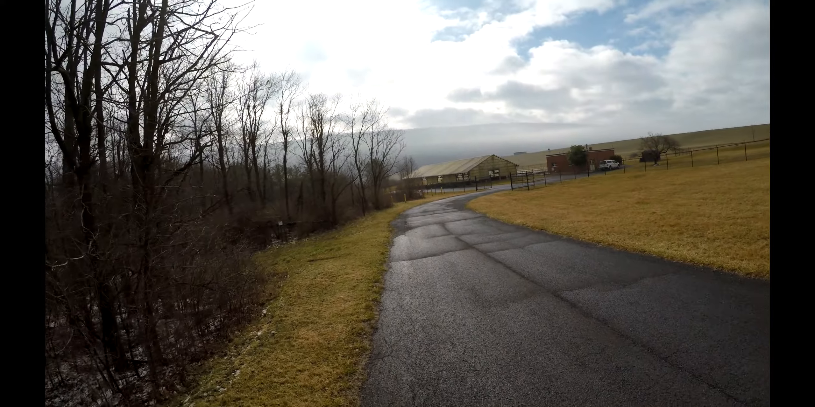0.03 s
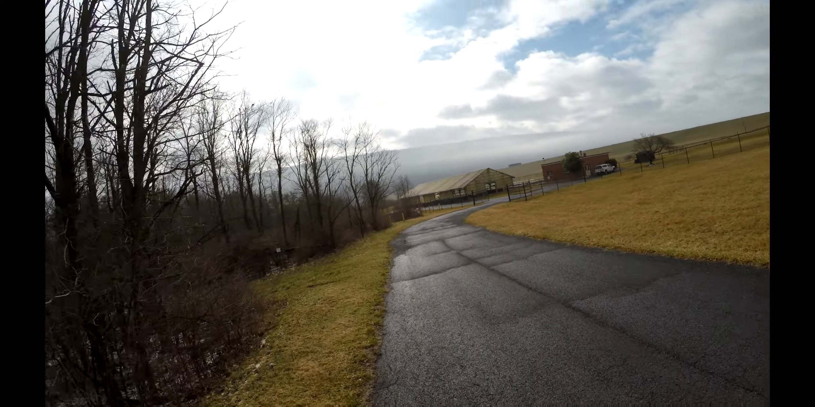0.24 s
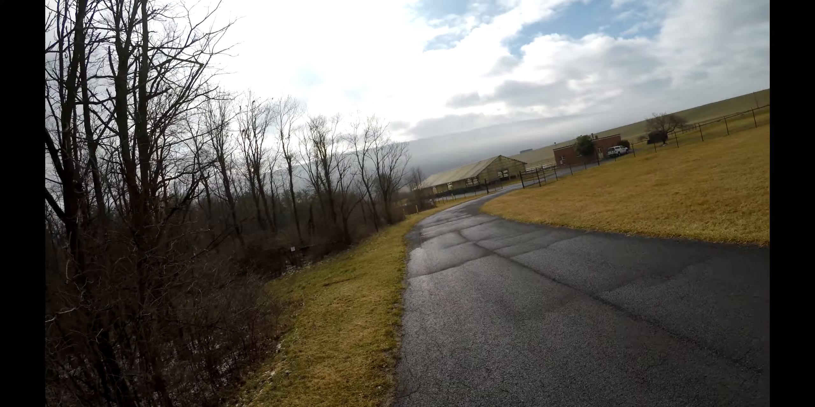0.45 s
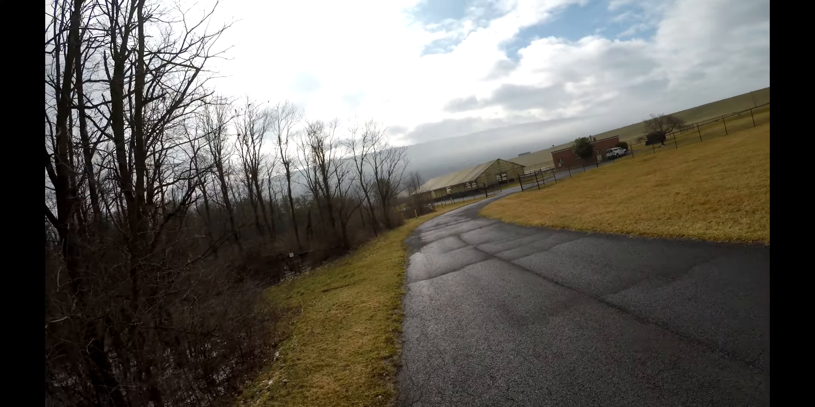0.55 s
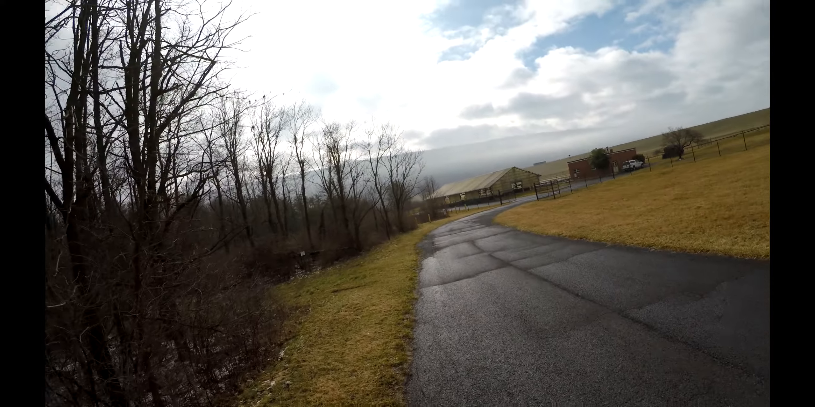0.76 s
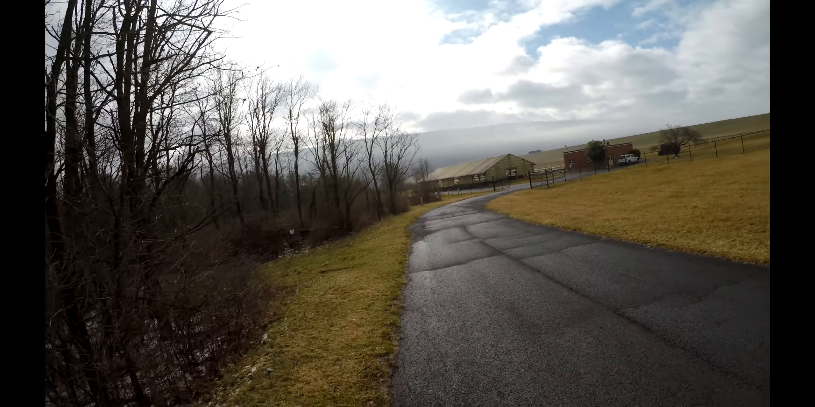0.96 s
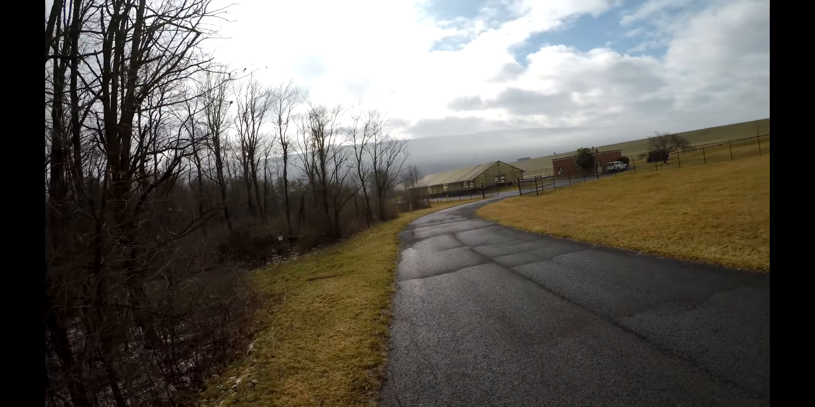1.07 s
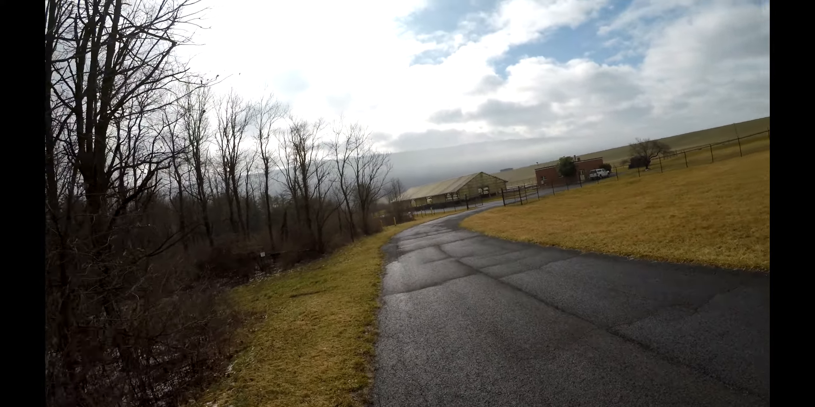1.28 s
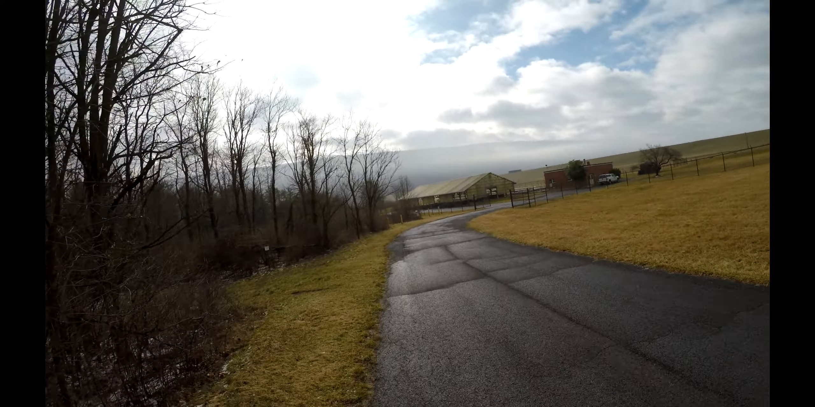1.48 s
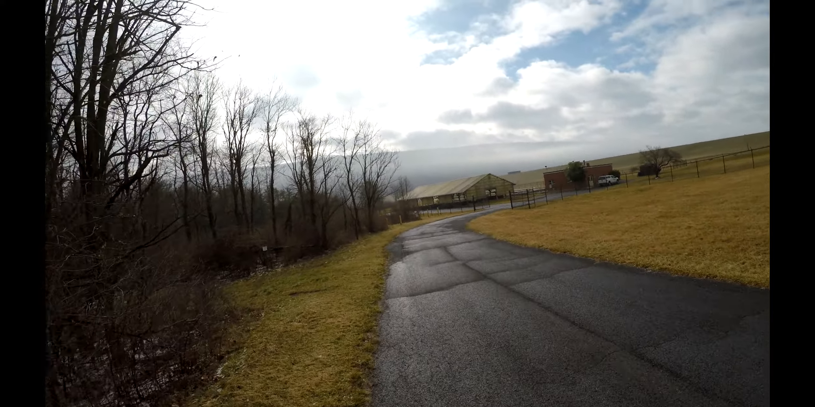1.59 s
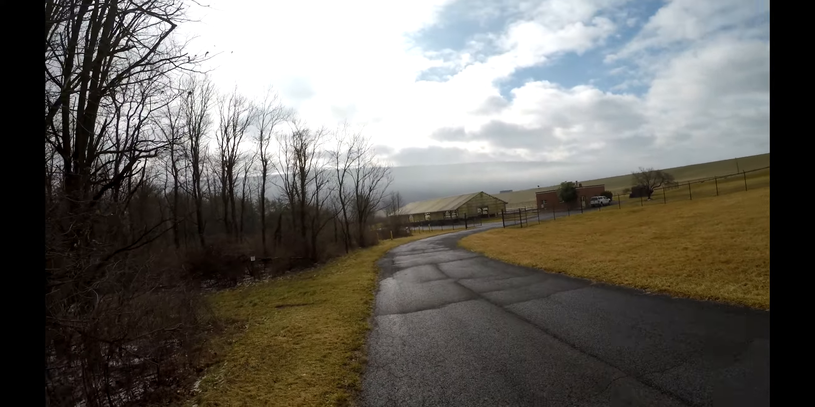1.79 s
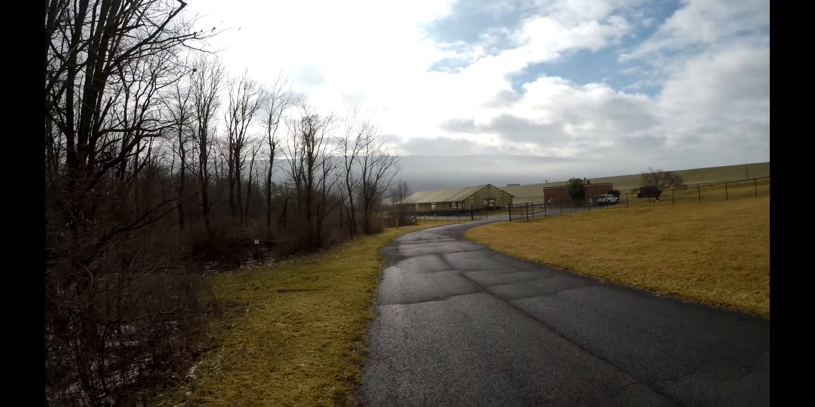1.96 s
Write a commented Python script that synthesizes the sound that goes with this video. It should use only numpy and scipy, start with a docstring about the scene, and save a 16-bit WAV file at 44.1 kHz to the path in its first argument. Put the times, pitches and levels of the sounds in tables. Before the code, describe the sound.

A plastic kayak hull is dragged over asphalt very close to the microphone: deep pulsing shudders, soft grainy grinding, ticking stones, one sharp hollow knock midway, then more bumps; faint bird whistles and wind outdoors.

```python
"""Plastic hull dragged over asphalt

A kayak is dragged close to two ports. With every step its hull shudders very low: swept sines with an octave partial.
All along it rumbles and grinds, rising and falling with the drag: patchy coloured noise, sparse grit in the grinding.
Stones tick, bumps ring and one knock sounds as damped modes; scuffs are grainy noise through hull resonances.
Far off, two whistles and a trill are frequency-modulated sines, and wind in bare trees is steady filtered noise."""
import sys
import numpy as np
from scipy import signal
from scipy.fft import rfft, irfft, next_fast_len
from scipy.io import wavfile
from scipy.ndimage import uniform_filter1d, map_coordinates

SR = 44100
rng = np.random.default_rng(int(sys.argv[2]) if len(sys.argv) > 2 else 0)


def wrap_up_sound(samples):
    """Save the sound to the file named by the first command line argument, as 16-bit audio."""
    columns = np.atleast_2d(samples).T
    # keep every value between -1 and 1, then stretch to whole-number steps
    tamed = np.clip(columns, -1, 1)
    steps = np.round(tamed * 32767).astype(np.int16)
    wavfile.write(sys.argv[1], SR, steps)


def natural_amplitude(level_db):
    """Convert a level in decibels to a linear amplitude factor, elementwise."""
    exponent = np.asarray(level_db, float) / 20
    return 10 ** exponent


N = 89655  # length in samples
LEFT_LAG_S = 0.0003465  # extra travel time to the left port

# Left-right correlation of the grinding and of the wind: f/Hz, likeness [0 to 1]
HIGH_ALIKE = [(300, 1), (700, 0.88), (2000, 0.22), (4000, 0.031), (8000, 0.041)]


def unit(x):
    """Normalisation: scale a signal to rms 1."""
    return x / np.sqrt(np.mean(x ** 2) + 1e-20)


def along(points, hz):
    """Interpolation of (f/Hz, value) points on a logarithmic frequency axis."""
    f, v = np.transpose(points)
    return np.interp(np.log(hz + 1), np.log(f + 1), v)


def wobble(rate):
    """Band-limited fluctuation: a spline through random knots, rate of them a second."""
    knots = rng.standard_normal(int(N * rate / SR) + 4)
    return map_coordinates(knots, [np.arange(N) * rate / SR])


def filtered(x, response):
    """Linear filtering: the spectrum times a complex response of frequency."""
    m = next_fast_len(x.shape[-1] + 8192)
    hz = np.fft.rfftfreq(m, 1 / SR)
    return irfft(rfft(x, m) * response(hz), m)[..., :x.shape[-1]]


def hiss(colour, count):
    """Coloured noise of rms 1: white noise shaped by a magnitude response."""
    return unit(filtered(rng.standard_normal(count), lambda hz: natural_amplitude(along(colour, hz))))


def spread(pair, spectrum, alike):
    """Interchannel coherence: mid and side noises give a coloured pair of rms 1; the left port is farther."""
    # Left over right by frequency: f/Hz, level difference/dB
    port_lean = [(30, -6.5), (110, -1), (200, -0.5), (700, -3.5), (2300, -2), (4200, 0.5), (7800, -4.5),
                 (14000, 0)]

    def mid_side(hz):
        angle = np.arccos(np.clip(along(alike, hz), -1, 1)) / 2
        return natural_amplitude(along(spectrum, hz)) * np.array([np.cos(angle), np.sin(angle)])

    def ports(hz):
        left = natural_amplitude(along(port_lean, hz)) * np.exp(-2j * np.pi * hz * LEFT_LAG_S)
        return np.array([left, np.ones(len(hz))])

    mid, side = filtered(pair, mid_side)
    return unit(filtered(np.array([mid + side, mid - side]), ports))


def patchy(patchy_db):
    """Non-stationary noise: two noises share time-frequency patches of random gain."""
    z = signal.stft(rng.standard_normal((2, N)), nperseg=512)[2]
    field = rng.standard_normal(z.shape[1:])
    field = uniform_filter1d(field, size=6, axis=0)
    field = uniform_filter1d(field, size=6, axis=1)
    noise = signal.istft(z * natural_amplitude(patchy_db * unit(field)), nperseg=512)[1]
    return unit(noise[:, :N])


def ring(modes, t, scatter_db, rise_s):
    """Modal decay: damped sines, each a little different in level and pitch at every blow."""
    total = 0
    for hz, db, t60 in modes:
        level = db + scatter_db * rng.normal() - 60 * t / t60
        pitch = hz * (1 + 0.0073 * scatter_db * rng.normal())
        total = total + natural_amplitude(level) * np.sin(2 * np.pi * pitch * t)
    return (1 - np.exp(-t / rise_s)) * total


def add(out, s, sound, left_db, lag_s=LEFT_LAG_S):
    """Interchannel level and time difference: place a sound at s, the left delayed by lag_s."""
    for ch, (lag, db) in enumerate([(lag_s, left_db / 2), (0, -left_db / 2)]):
        part = out[ch, round((s + lag) * SR):][:len(sound)]
        part += natural_amplitude(db) * sound[:len(part)]


def air():
    """Turbulence noise: a steady far hiss of wind in bare trees."""
    # Wind spectrum: f/Hz, relative level/dB per Hz
    air_colour = [(710, -31), (1200, -8), (1280, 5.5), (1610, -4.5), (2030, -10.5), (5440, -23),
                  (6500, -20.5), (7050, -11.5), (7800, -14), (8300, -22), (9900, -10.5), (14800, -43)]
    level = -63.5 + 0.61 * wobble(7.9)
    return natural_amplitude(level) * spread(patchy(patchy_db=1.0), air_colour, HIGH_ALIKE)


def whistles():
    """Frequency modulation: two thin whistled calls: one arches and falls, one rises, dips and climbs again."""
    # Two calls, each a path of t/s, f/Hz, level/dB, before wavering
    whistle_calls = [
        [(.305, 2690, -70), (.318, 2710, -60), (.33, 2740, -72), (.342, 2730, -70), (.352, 2710, -60),
         (.38, 2670, -66), (.42, 2645, -66), (.45, 2480, -64), (.468, 2290, -70)],
        [(.645, 2620, -70), (.67, 2740, -58), (.7, 2740, -59), (.73, 2715, -63), (.76, 2700, -62),
         (.78, 2630, -61), (.8, 2690, -63), (.82, 2720, -62), (.835, 2760, -72)],
    ]
    waver_hz, waver_db = 18, 3.2
    t, out = np.arange(N) / SR, np.zeros(N)
    for call in whistle_calls:
        s, hz, db = np.transpose(call)
        pitch = np.interp(t, s, hz) + waver_hz * wobble(60)
        level = np.interp(t, s, db, left=-120, right=-120) + waver_db * wobble(80)
        out += np.sqrt(2) * natural_amplitude(level) * np.sin(2 * np.pi * np.cumsum(pitch) / SR)
    return out


def trill():
    """Amplitude modulation by noise: a wavering sine made rough and breathy, louder at the right."""
    # Pitch path: t/s, f/Hz before wavering, level/dB before roughness and stereo lean
    trill_path = [(0.6, 7000, -68), (0.631, 7600, -53.5), (.655, 7400, -58), (.675, 7800, -60),
                  (0.7, 7800, -55), (.715, 7280, -62), (.74, 7320, -51), (0.775, 7500, -66)]
    waver_hz, rough_hz = 99, 380
    t = np.arange(N) / SR
    s, hz, db = np.transpose(trill_path)
    pitch = np.interp(t, s, hz) + waver_hz * wobble(120)
    level = np.interp(t, s, db, left=-120, right=-120)
    tone = wobble(rough_hz * 2) * np.sin(2 * np.pi * np.cumsum(pitch) / SR)
    return natural_amplitude([[-3], [3]]) * natural_amplitude(level) * tone


def ticks():
    """Impact excitation: a stone under the hull rings three short modes with a snap of treble noise."""
    # Stones: t/s, level/dB before trim, f/Hz, treble over middle/dB, left over right/dB
    stones = [(0.667, -41.5, 2000, -6.5, -14.5), (0.682, -37, 2010, -17, -17), (0.728, -46.5, 1340, -8, -5),
              (0.744, -41.5, 2760, -0.5, -2), (0.8254, -45, 1290, -12, 3), (0.9063, -54, 1470, -29, -13),
              (1.0067, -44.5, 1690, -6.5, -7.5), (1.1309, -38.5, 1920, -18, -8),
              (1.1324, -37.5, 3600, -21, -11), (1.3355, -40, 2040, -9, -11),
              (1.3485, -44.5, 3640, -1.5, -11), (1.5788, -49, 2180, -24, -18),
              (1.6063, -41, 1800, -11.5, -12.5), (1.6902, -36.5, 2120, -14.5, -14),
              (1.9104, -42.5, 1250, -21, -12), (1.9905, -45, 2090, -30, -14), (2.02, -43, 1570, -22, 3)]
    # Snap spectrum: f/Hz, relative level/dB
    snap_colour = [(2500, -36), (4000, -2.5), (6000, -6), (7500, 3.5), (10000, -13), (14000, -26.5)]
    trim_db, cycles, snap_s = 1.0, 11, 0.025  # cycles and s to fall by 60 dB
    out, t = np.zeros((2, N)), np.arange(SR // 10) / SR
    for s, db, hz, treble_db, left_db in stones:
        t60 = cycles / hz
        modes = [(hz, 0, t60), (0.64 * hz, -6, t60), (1.36 * hz, -6, t60)]
        skin = ring(modes, t, scatter_db=0.8, rise_s=0.0001)
        snap = natural_amplitude(treble_db - 60 * t / snap_s) * hiss(snap_colour, len(t))
        add(out, s, natural_amplitude(db + trim_db) * (skin + snap), left_db, lag_s=0.00007)
    return out


def bumps():
    """Modal decay: the hull's low bumps and rings, and a few small bright scrape grains."""
    # Bumps and grains: t/s, level/dB before trim, f/Hz, t60/s, left over right/dB
    hull_bumps = [(.147, -37, 200, .06, -2), (.296, -39, 450, .02, -5), (.479, -41, 600, .025, -3),
                  (.69, -31, 205, .2, -3), (.749, -41, 1600, .035, -3), (1.484, -40, 550, .03, -3),
                  (1.657, -33, 420, .04, -4), (1.656, -37, 1200, .025, -8), (1.6575, -43, 2250, .02, -8),
                  (1.666, -44, 2300, .02, -8), (1.673, -39, 480, .05, -4), (1.703, -32, 220, .2, -3),
                  (1.7885, -31.5, 440, .025, -2), (1.7665, -43, 1550, .02, -8),
                  (1.767, -46, 2750, .015, -8), (1.778, -46, 2150, .02, -8), (1.841, -38, 300, .04, -2),
                  (1.84, -45, 1600, .018, -4), (1.952, -38, 700, .018, -4), (1.97, -50, 750, .14, -2)]
    trim_db = 3.5
    out, t = np.zeros((2, N)), np.arange(SR // 10) / SR
    for s, db, hz, t60, left_db in hull_bumps:
        modes = [(hz, 0, t60), (1.4 * hz, -8, 0.4 * t60)]
        sound = ring(modes, t, scatter_db=1, rise_s=0.0005)
        add(out, s, natural_amplitude(db + trim_db) * sound, left_db, lag_s=0)
    return out


def scuffs():
    """Source and filter: grainy friction noise excites the resonances of the hull."""
    # Scuffs: t/s, length/s, level/dB at the start, brightening/dB per octave up to 3 kHz
    rubs = [(1.335, 0.034, -57.5, 4), (1.6553, 0.02, -40, -1.5), (1.7684, 0.016, -46, 4),
            (1.84, 0.0099, -45, -11)]
    # Broad friction spectrum: f/Hz, relative level/dB per Hz
    scuff_colour = [(150, -40), (300, -1), (500, 0.5), (1100, 0), (1700, -4.5), (2400, -12), (3300, -12.5),
                    (5000, -16.5), (7500, -13.5), (12000, -31), (16000, -71)]
    # Hull resonances: f/Hz, bandwidth/Hz, level over the broad colour/dB
    hull_rings = [(483, 160, 5.5), (1060, 160, 4), (1650, 220, 2.5), (2230, 130, 8), (2850, 160, 5)]
    coarse_db, grain_s, fade_db = 3.5, 0.001, -6  # fade over the length
    out, t = np.zeros((2, N)), np.arange(SR // 10) / SR

    def hull(f):
        return 1 + sum(natural_amplitude(db) * 1j * f * w / (c * c - f * f + 1j * f * w) for c, w, db in hull_rings)

    for s, length, db, tilt_db in rubs:
        colour = [(hz, level + tilt_db * np.log2(min(hz, 3000) / 1000)) for hz, level in scuff_colour]
        roughness = np.interp(t / grain_s, np.arange(200), rng.standard_normal(200))
        grains = unit(natural_amplitude(coarse_db * roughness))
        sound = unit(filtered(grains * hiss(colour, len(t)), hull))
        attack = np.clip(t / 0.001, 0, 1)
        release_db = -60 * np.clip(t - length, 0, 1) / 0.022
        add(out, s, sound * attack * natural_amplitude(db + fade_db * t / length + release_db), left_db=-13)
    return out


def knock():
    """Impulse response: one short swing with a treble snap, then the hull's damped modes."""
    # Hull after the blow: f/Hz, level/dB relative to the blow, t60/s
    body_modes = [(341, -5, 0.021), (441, -3.5, 0.019), (532, -9.5, 0.015), (1010, -18.5, 0.016),
                  (2220, -34, 0.022)]
    # Snap spectrum: f/Hz, relative level/dB
    blow_colour = [(2500, -17), (3300, 0.5), (5200, -6), (7500, -8), (10000, -15), (14000, -30)]
    start_s, level_db, left_db = 0.7888, -13, -13
    crack_hz, crack_s, snap_db = 1480, 0.00026, -27.5
    body_after_s, body_left_db = 0.0017, -2.5
    out, t = np.zeros((2, N)), np.arange(SR // 10) / SR
    late = t - 3.4 * crack_s  # time from the peak of the swing
    crack = -np.exp(-(late / crack_s) ** 2 / 2) * np.cos(2 * np.pi * crack_hz * late)
    snap = natural_amplitude(snap_db - 60 * abs(late) / 0.0043) * hiss(blow_colour, len(t))
    add(out, start_s, natural_amplitude(level_db) * (crack + snap), left_db)
    body = ring(body_modes, t, scatter_db=2.5, rise_s=0.00054)
    add(out, start_s + body_after_s, natural_amplitude(level_db) * body, body_left_db)
    return out


def drag():
    """Friction-driven noise: the hull rumbles with its weight; asphalt grinds it with noise and sparse grit."""
    # Course of the drag: t/s, weight on the ground/dB, grinding/dB, both before offsets
    drag_course = [(0.0, -30.5, -57), (0.07, -34.5, -57), (0.21, -40, -53.5), (0.28, -32, -51),
                   (0.3, -50, -52), (0.35, -33, -52), (0.52, -32, -52), (0.57, -31, -50.5),
                   (0.671, -36.5, -50), (0.692, -21.5, -48.5), (0.82, -40, -49), (0.84, -37.5, -53),
                   (1.01, -35, -57), (1.06, -39.5, -55), (1.08, -42, -57.5), (1.15, -38, -56),
                   (1.24, -37.5, -57), (1.29, -40, -55), (1.39, -32, -52.5), (1.45, -28, -53.5),
                   (1.51, -31.5, -54), (1.64, -31, -51.5), (1.71, -28.5, -49), (1.77, -32, -50),
                   (1.838, -35, -48), (1.93, -44, -54), (1.99, -33, -54), (2.03, -32, -51)]
    # Rumble and grinding spectra: f/Hz, relative level/dB per Hz
    rumble_colour = [(11, -45), (18, 3.5), (37, 11), (60, 1.5), (92, 2), (114, 2), (151, -5.5), (461, -26),
                     (600, -26.5), (780, -37.5), (1320, -120)]
    grind_colour = [(150, -23), (250, -6), (424, -15), (733, -20.5), (869, -16), (1010, -20), (1100, -18.5),
                    (2110, -29), (2460, -30), (4250, -37), (6500, -35), (7050, -30.5), (7800, -33),
                    (8400, -35.5), (12700, -47.5), (14800, -60)]
    # Left-right correlation of the rumble: f/Hz, likeness [0 to 1]
    low_alike = [(30, 0.88), (300, 0.98), (600, 0.48)]
    rumble_db, grind_db = 4, 5  # offsets over the course
    grit_db, grit_per_s, grit_spread_db = -1.5, 900, 1.8  # grit level is over the grinding noise
    t = np.arange(N) / SR
    s, weight, grinding = np.transpose(drag_course)
    rumble_level = np.interp(t, s, weight) + rumble_db + 0.94 * wobble(18)
    rumble = spread(patchy(patchy_db=3.0), rumble_colour, low_alike) * natural_amplitude(rumble_level)
    strikes = rng.random((2, N)) < grit_per_s / SR
    force = natural_amplitude(grit_spread_db * rng.exponential(size=(2, N)))
    grit = strikes * force * np.sign(rng.normal(size=(2, N)))
    rough = patchy(patchy_db=2.35) + natural_amplitude(grit_db) * unit(grit)
    grind_level = np.interp(t, s, grinding) + grind_db + 1.36 * wobble(17.92)
    return rumble + spread(rough, grind_colour, HIGH_ALIKE) * natural_amplitude(grind_level)


def shudder():
    """Low-frequency oscillation: a few slow swings of the hull swell, hurry for a moment, sag and stop."""
    # Tugs of the steps: t/s, length/s, level/dB before stereo lean, base f/Hz, quickest moment t/s
    tugs = [(0.035, 0.043, -29, 47.5, .05), (0.116, 0.064, -24.5, 27.9, .13),
            (0.174, 0.16, -13, 34.04, .262), (0.336, 0.04, -25, 34.4, .355), (0.474, 0.12, -46, 28.9, .5),
            (0.545, 0.032, -28, 46.4, .56), (0.599, 0.059, -14, 39.2, .612),
            (0.698, 0.038, -17.5, 28.8, .7), (0.731, 0.11, -11, 35, .797), (1.195, 0.041, -29, 43.5, 1.21),
            (1.25, 0.1507, -14.5, 35.25, 1.34), (1.413, 0.032, -27.5, 35.3, 1.43),
            (1.628, 0.087, -31.5, 34.2, 1.66), (1.682, 0.057, -15.5, 39.05, 1.692),
            (1.781, 0.15, -12.5, 35.34, 1.88), (1.966, 0.051, -33.5, 39.8, 1.98)]
    rise, fall = 0.26, 0.3  # shares of the length
    quicker, quick_s, sag = 0.439, 0.015, 0.17  # share of pitch gained, its width, share lost by the end
    overtone_db, left_db, left_lag_rad = -18, -8.5, 0.47
    out, t = np.zeros((2, N)), np.arange(N) / SR
    for s, length, db, hz, quick in tugs:
        u = np.clip((t - s) / length, 0, 1)
        swell = np.sin(np.pi / 2 * np.clip(np.minimum(u / rise, (1 - u) / fall), 0, 1))
        hurry = np.exp(-((t - quick) / quick_s) ** 2 / 2)
        pitch = hz * (1 + quicker * hurry - sag * u ** 4)
        phase = 2 * np.pi * np.cumsum(pitch * (t >= s)) / SR - np.array([[left_lag_rad], [0]])
        swing = np.sin(phase) + natural_amplitude(overtone_db) * np.sin(2 * phase)
        out += natural_amplitude(db) * np.sqrt(2) * swell * swing
    return out * natural_amplitude([[left_db / 2], [-left_db / 2]])


def scene():
    """Superposition: the pressures of all sources add at the two ports."""
    far = air() + whistles() + trill()
    contacts = ticks() + bumps() + scuffs() + knock()
    return far + contacts + drag() + shudder()


def band_limit(x):
    """A steep low-pass at the top of the band."""
    return signal.sosfilt(signal.butter(12, 14910, fs=SR, output="sos"), x)


def record(dry):
    """Signal chain: the finished stereo mix goes through its last stage."""
    return band_limit(dry)


dry = scene()
out = record(dry)
wrap_up_sound(out)
```